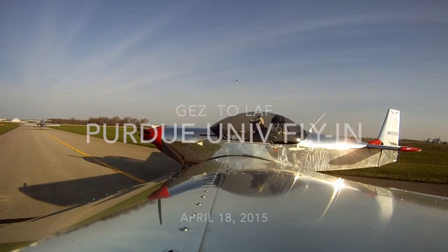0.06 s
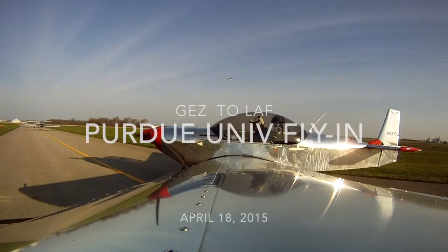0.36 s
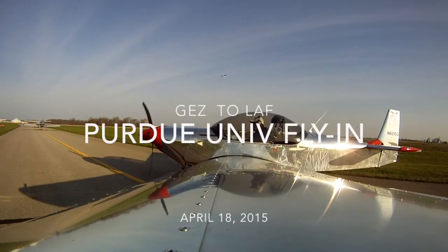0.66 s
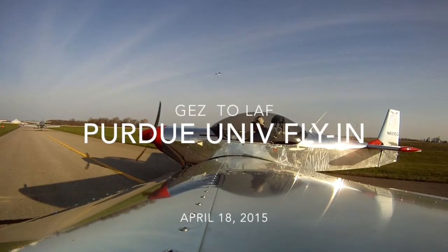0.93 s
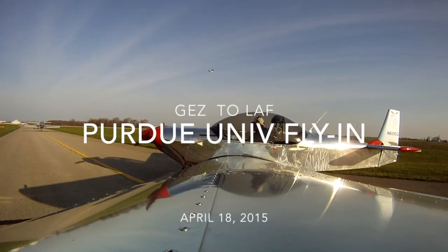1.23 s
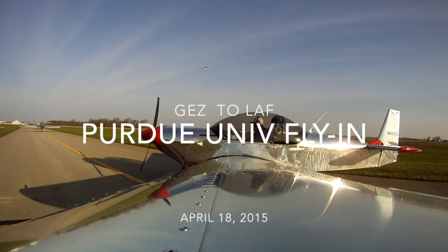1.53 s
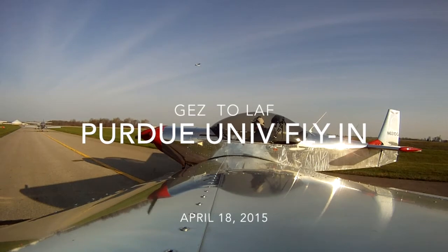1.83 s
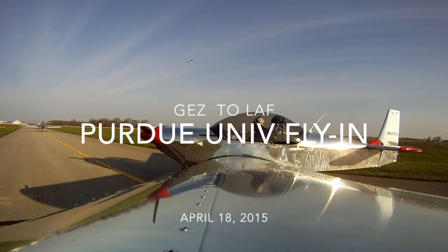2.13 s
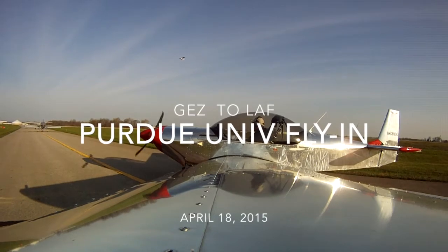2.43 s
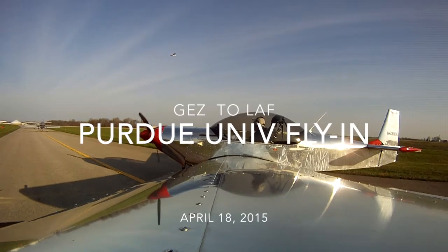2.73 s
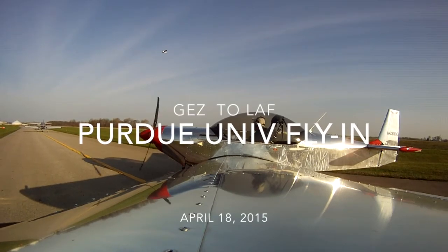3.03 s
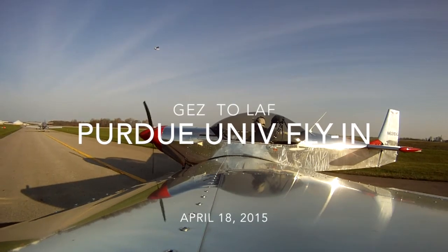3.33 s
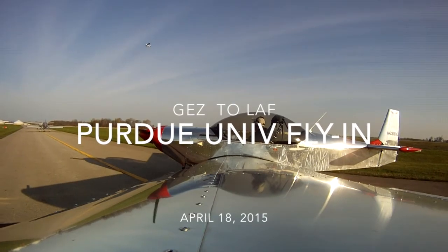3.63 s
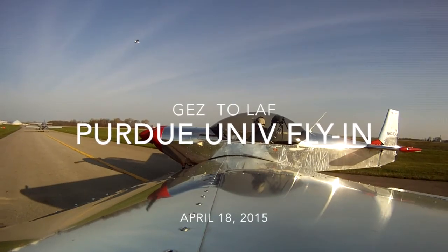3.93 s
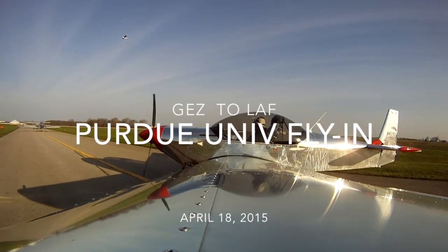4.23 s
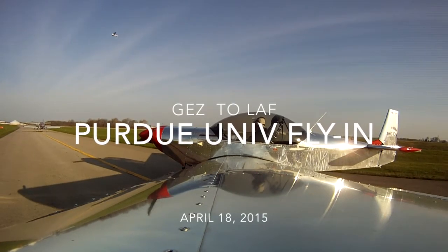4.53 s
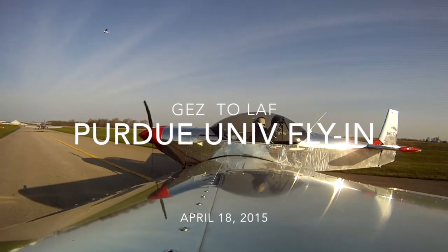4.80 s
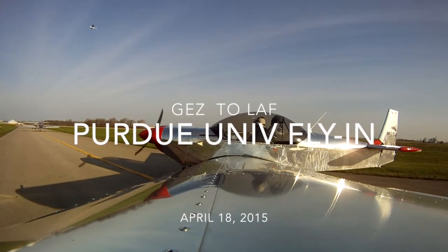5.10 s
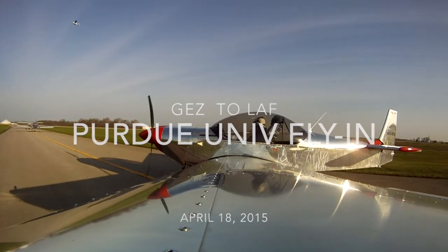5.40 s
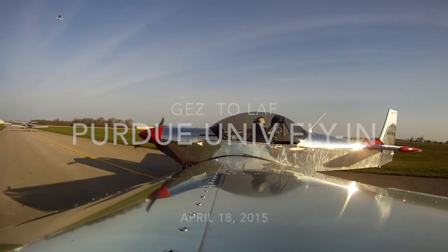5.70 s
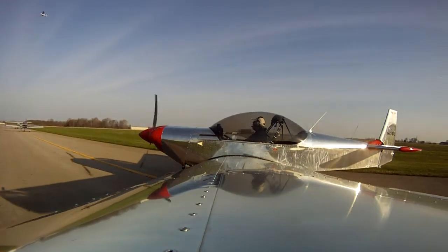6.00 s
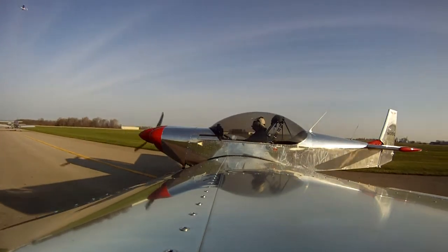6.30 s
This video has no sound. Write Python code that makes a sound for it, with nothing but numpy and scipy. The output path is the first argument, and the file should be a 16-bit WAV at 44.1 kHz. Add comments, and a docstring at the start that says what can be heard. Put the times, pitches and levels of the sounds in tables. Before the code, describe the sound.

Wind rumbles on a wing-mounted microphone as a light aircraft rolls along a taxiway, its engine and propeller throbbing at low speed. The wheels bump over joints, making the airframe knock and boom, and thin metallic rattles and clinks soon join in. About halfway through, the engine revs a little and eases off, then speeds up again while a panel briefly buzzes.

```python
"""On a taxiway, at the wing tip of a light aircraft with a six-cylinder engine and a two-blade propeller.
Blade passage and exhaust pulses drone at multiples of the crankshaft speed as the throttle is eased
up and down. Turbulent air buffets the camera housing, and the exhaust clatters in its resonances.
Loose parts rattle, hum and buzz in forced vibration, in step with the engine, and the airframe
knocks and booms as the wheels bump over joints."""
import sys
import numpy as np
from scipy import signal
from scipy.fft import rfft, irfft
from scipy.io import wavfile
from scipy.ndimage import uniform_filter1d

SR = 44100
rng = np.random.default_rng(int(sys.argv[2]) if len(sys.argv) > 2 else 0)


def master(y):
    """Save y as 16-bit WAV."""
    cut = np.clip(np.atleast_2d(y).T, -1, 1)
    pcm = np.round(cut * 32767)  # scale
    wavfile.write(sys.argv[1], SR, pcm.astype(np.int16))


N = 288855
TIME = np.arange(N) / SR
BINS = np.fft.rfftfreq(N, 1 / SR)

# faint air noise that differs between the ears: (frequency [Hz], gain [dB])
STRAY_AIR_SPECTRUM = [(35, -12), (60, -2), (150, -29), (300, -1), (480, 6.5), (1000, -11), (2200, -25),
                      (4000, -25.5), (6000, -29)]
# air buffeting the housing: (frequency [Hz], gain [dB])
BUFFET_SPECTRUM = [(15, -26), (28, -8), (42, 8.5), (70, 3), (110, 6), (150, 4), (172, 3.5), (195, -1),
                   (240, -7), (315, -20), (400, -31), (600, -68)]
# strength of the gusts: (time [s], relative level [dB])
GUSTS = [(0, -21.5), (.6, -20.5), (1.15, -26), (1.9, -29), (2.5, -35), (3.35, -27.5), (3.75, -29),
         (4.2, -27.5), (5.2, -30.5), (6.1, -37.5), (6.55, -25.5)]

# undercarriage knocks: (time [s], level [dB], decay time [s], swish level [dB])
KNOCKS = [(.464, -25.5, 0.0083, -60), (1.443, -37, 0.011, -48), (2.56, -34, .018, -43),
          (2.861, -36, 0.017, -58), (3.70, -30.5, .016, -48), (4.12, -35, 0.036, -53),
          (4.843, -29.5, 0.042, -38.5), (5.698, -37, 0.014, -40.5), (5.99, -28, 0.01, -37)]
# sharp cracks of the airframe: (time [s], level [dB], centre [Hz])
CRACKS = [(.465, -22, 1400), (1.747, -24.5, 900), (3.068, -36, 2000)]
# hollow booms of the wing skin: (time [s], level [dB], centre [Hz], width [octaves])
BOOMS = [(.87, -15.5, 179, 0.046), (1.02, -38.5, 560, 0.34), (1.13, -21, 220, 0.2), (1.755, -32, 24, 0.41),
         (2.21, -31.5, 520, 0.38), (2.31, -32.5, 516, 0.093), (3.735, -34, 530, 0.11),
         (3.8, -29, 275, 0.19), (3.98, -35.5, 480, .45)]

# shaking by engine and propeller wash: (time [s], relative level [dB])
SHAKING = [(0, -34), (.55, -34.5), (.95, -38), (1.6, -41.5), (2.3, -41.5), (3, -40.5), (3.3, -38),
           (3.7, -39), (4.38, -40), (4.55, -39.5), (4.85, -36.5), (5.05, -39.5), (5.62, -37.5), (6.12, -41),
           (6.55, -36.5)]
# brief dips and swells of the shaking: (time [s], change [dB])
SHAKING_CHANGES = [(1.605, -4.5), (2.481, -5), (3.021, -9), (3.26, -2), (3.68, 2.5), (3.86, -3),
                   (4.06, -5.5), (4.53, 2), (5.09, -3.5), (5.33, 2.5), (5.78, -3.5), (6.37, -2)]
# modes of the loose fitting: (frequency [Hz], relative level [dB], time to fall 60 dB [s])
FITTING_MODES = [(1978, 9, 0.19), (2450, 15, 0.049), (2860, 3.5, 0.06), (3574, 8.5, 0.11),
                 (3744, 2.5, 0.092), (3850, 1.5, 0.097), (3990, 6.5, 0.029), (4380, -4, 0.087),
                 (4570, 1, 0.044), (4780, 3.5, 0.066), (5070, 8, 0.021), (5540, 7, 0.086)]
# tone colour of the fitting: (frequency [Hz], gain [dB])
FITTING_SPECTRUM = [(1200, -26), (1950, 2), (2400, -5.5), (3250, 15.5), (3600, 1), (4200, 10.5), (4900, 3),
                    (5400, 1.5), (6000, -32)]
# strength of its rattle: (time [s], relative level [dB])
RATTLE_LEVELS = [(0, -54), (.6, -62), (1, -102), (1.4, -74), (1.66, -41), (2.7, -43.5), (3.3, -40),
                 (3.8, -41.5), (4.7, -40.5), (5.3, -50), (6.55, -45)]
# its hardest blows: (time [s], relative level [dB])
CLINKS = [(1.719, -27.5), (1.821, -44), (1.943, -27), (2.187, -31.5), (2.266, -32.5), (2.426, -35),
          (2.855, -38), (3.209, -32), (3.97, -34), (4.51, -40), (5.186, -30.5), (5.497, -36)]
# resonances and notches of the housing: (centre [Hz], width [Hz], gain [dB])
HOUSING_MODES = [(519.5, 14, 9), (734, 9.8, 8), (976, 15, 9.5), (1192, 20, 5), (1462, 40, 7.5),
                 (1927, 44, 8.5), (2880, 23, 2), (3300, 250, -30), (3600, 170, 5), (3680, 43, -11),
                 (5960, 105, 15.5)]
# propeller wash and exhaust puffs: (frequency [Hz], gain [dB])
CLATTER_SPECTRUM = [(200, -75), (330, -13), (430, -6), (560, 0.5), (850, -7), (1230, -0.5), (1650, -6),
                    (2150, -5), (2600, -9), (3280, -10.5), (3600, -11.5), (4200, -20), (5200, -15.5),
                    (6000, -39)]

# engine speed: (time [s], crankshaft speed [turns/s])
CRANK_SPEED = [(0, 17.5), (.6, 16.5), (.9, 16.6), (1.35, 16.1), (1.65, 16.1), (2.1, 16.4), (2.4, 16.85),
               (2.65, 17.65), (3.15, 17.7), (3.47, 20.4), (3.73, 20.6), (4.05, 17.25), (4.2, 17), (4.5, 19),
               (4.7, 21.3), (5, 22.6), (5.6, 22.1), (5.85, 23.3), (6.55, 25.3)]
# blade passage and its overtone, firing and two overtones: (order [cycles/turn])
MAIN_ORDERS = [2, 4, 3, 6, 9]
# strength of each main tone: (relative level [dB])
MAIN_LEVELS = [-1, -8, .5, .5, -8]
# resonances of exhaust and airframe: (centre [Hz], width [Hz], gain [dB])
AIRFRAME_MODES = [(48.3, 10, -20.5), (62, 22, -30), (103, 6, -20.5), (115, 18, -31), (136, 30, -20),
                  (167, 22, -17), (205, 30, -26)]
# passing fades of the lowest tones: (time [s], half length [s], change [dB])
BASS_FADES = [(0.109, 0.59, -10), (5.173, 0.24, -8)]
# weak tones of unequal cylinders, and high firing overtones: (order [cycles/turn])
WEAK_ORDERS = [2.5, 3.5, 4.5, 5, 5.5, 6.5, 7, 7.5, 8, 10, 10.5, 12, 15, 18, 21, 24]
# strength of each weak tone: (level before the muffler [dB])
WEAK_LEVELS = [-39, -43, -36, -37, -42, -52, -38, -31, -38, -41, -38, -41, -55, -62, -63, -59]
# response of the muffler to the weak tones: (frequency [Hz], gain [dB])
MUFFLER_RESPONSE = [(40, 3), (205, -2.5), (255, -6), (295, -3), (360, -9.5), (450, 5.5), (650, -10)]


def amp(db):
    """Amplitude ratio: tenfold for every 20 dB."""
    return 10 ** (np.asarray(db) / 20)


def unit(x):
    """Normalisation to an rms of 1."""
    return x / np.sqrt(np.mean(x ** 2) + 1e-20)


def curve(rows):
    """Linear interpolation of a (time, value) table at every sample."""
    return np.interp(TIME, *np.transpose(rows))


def filtered(x, response):
    """Linear filtering: the spectrum is multiplied by a frequency response."""
    return irfft(rfft(x) * response, N)


def colour(x, spectrum):
    """Spectral shaping by a (frequency, gain) table, interpolated in log frequency."""
    hz, db = np.transpose(spectrum)
    return filtered(x, amp(np.interp(np.log(BINS + 1), np.log(hz), db)))


def wander(rate_hz):
    """Random modulation: low-pass noise of rms 1."""
    return unit(filtered(rng.standard_normal(N), 1 / (1 + (BINS / rate_hz) ** 4)))


def steadied(x, amount):
    """Compression: the running power sets a gain that evens out a turbulent sound."""
    power = abs(uniform_filter1d(unit(x) ** 2, size=2000))
    return unit(x / (power + .01) ** (amount / 2))


def strokes(cycles, spread_db, decay_s, rise_s):
    """Pulse-train envelope: one decaying blow of random strength per cycle."""
    onsets = np.flatnonzero(np.diff(np.floor(cycles)) > 0)
    blows = np.zeros(N)
    blows[onsets] = amp(spread_db * np.clip(rng.standard_normal(N)[onsets], -3, 1.7))
    t = TIME[:3000]
    pulse = np.exp(-t / decay_s) * (1 - np.exp(-t / rise_s))
    return unit(signal.oaconvolve(blows, pulse)[:N])


def stray_air(level_db=-63.5):
    """Decorrelation: faint air noise makes the two ears differ slightly."""
    return amp(level_db) * unit(colour(rng.standard_normal(N), STRAY_AIR_SPECTRUM))


def buffet(deep_db=-24, deep_follow=0.08, upper_db=-2, crossover_hz=190):
    """Turbulent pressure fluctuations thump the housing; stronger gusts reach higher in frequency."""
    air = steadied(colour(rng.standard_normal(N), BUFFET_SPECTRUM), 0.37)
    deep = filtered(air, 1 / (1 + (BINS / crossover_hz) ** 6))
    gust_db = curve(GUSTS)
    deep_gain = amp(deep_db + deep_follow * (gust_db - gust_db.mean()))
    return deep_gain * unit(deep) + amp(gust_db + upper_db) * unit(air - deep)


def jolt(peak_s, db, hz, octaves, rise_s, decay_s, edge_db=-24):
    """Transient response of one band of the airframe: a noise burst with a bright edge."""
    t = np.arange(-SR // 4, SR // 2) / SR
    bins = np.fft.rfftfreq(len(t), 1 / SR)
    band = np.exp(-.5 * (np.log2((bins + 1) / hz) / octaves) ** 2)
    edge = amp(edge_db) * (bins > hz) * (bins < 5 * hz) * min(octaves / 0.85, 1)
    envelope = amp(db) * np.exp(-np.maximum(-t / rise_s, t / decay_s))
    noise = unit(irfft(rfft(rng.standard_normal(len(t))) * (band + edge), len(t)))
    return np.interp(TIME, round(peak_s * SR) / SR + t, envelope * noise, left=0, right=0)


def bumps(swish_lag_s=.027):
    """Impact excitation at taxiway joints: knocks with their swishes, cracks and booms."""
    out = np.zeros(N)
    for s, db, decay_s, swish_db in KNOCKS:
        out += jolt(s, db, hz=1350, octaves=0.21, rise_s=0.0016, decay_s=decay_s)
        out += jolt(s + swish_lag_s, swish_db, hz=4500, octaves=0.99, rise_s=0.045, decay_s=0.023)
    for s, db, hz in CRACKS:
        out += jolt(s, db, hz, octaves=.95, rise_s=.0009, decay_s=.0055)
    for s, db, hz, octaves in BOOMS:
        out += jolt(s, db, hz, octaves, rise_s=0.025, decay_s=0.06)
    return out


def shaking_gain(flicker_db=1.12, change_s=0.025):
    """Amplitude modulation of the shaking: random flicker plus brief, timed dips and swells."""
    changes_db = sum(db * np.exp(-((TIME - s) / change_s) ** 2) for s, db in SHAKING_CHANGES)
    return amp(flicker_db * wander(10) + changes_db)


def cover_hum(crank, centre_hz=2010, width_hz=180, base_db=-43, growth=2.1, steady_push=0.58):
    """Forced resonance: firing pulses push a hollow cover, whose hum grows faster than the shaking."""
    push = steady_push + strokes(3 * crank, spread_db=6, decay_s=0.01, rise_s=0.002)
    resonance = 1 / (1 + 1j * (BINS - centre_hz) / width_hz) ** 2
    ring = filtered(push * rng.standard_normal(N), resonance)
    shaking_db = curve(SHAKING)
    return amp(base_db + growth * (shaking_db - shaking_db.mean())) * steadied(ring, 0.13)


def panel_buzz(crank, start_s=5.15, end_s=5.76, centre_hz=3650, width_hz=420):
    """Sympathetic vibration: for a set span a resonating panel slaps once per passing blade."""
    slaps = strokes(2 * crank, spread_db=2, decay_s=.005, rise_s=.002)
    ring = filtered(rng.standard_normal(N), 1 / (1 + (2 * (BINS - centre_hz) / width_hz) ** 4))
    ring /= np.sqrt(abs(uniform_filter1d(ring ** 2, size=300)) + 1e-9)  # slaps ring about equally hard
    elapsed_s = np.maximum(TIME - start_s, 0)
    attack = np.minimum(elapsed_s / .1, 1)
    release = np.exp(-np.maximum(TIME - end_s, 0) / .09)
    level_db = -42 - 6.5 * elapsed_s
    return amp(level_db) * attack * release * unit(slaps * ring)


def fitting_blows(cycles, spread_db, unevenness, rise_s, detune_hz=55):
    """Modal superposition: one blow per cycle, each shared differently among the fitting's modes."""
    onsets = np.flatnonzero(np.diff(np.floor(cycles)) > 0)
    chance = rng.standard_normal((800, len(FITTING_MODES) + 1))[:len(onsets)]
    strength = amp(spread_db * np.clip(chance[:, -1], -3, 1.3))
    t, out = TIME[:4000], np.zeros(N)
    attack = 1 - np.exp(-(t / rise_s) ** 2)
    for share, (hz, db, t60) in zip(chance.T, FITTING_MODES):
        blows = np.zeros(N)
        blows[onsets] = strength * np.sign(share) * abs(share) ** unevenness
        mode = attack * amp(db - 60 * t / t60) * np.exp(2j * np.pi * hz * t)
        ring = signal.oaconvolve(blows, mode)[:N]
        drift = np.cumsum(detune_hz * wander(20)) / SR  # the loose contact detunes the ring
        out += (ring * np.exp(2j * np.pi * drift)).real
    return unit(out)


def fitting_rattle(crank, gain_db=-2, scrape_db=-10):
    """Intermittent contact: a loose fitting strikes, rebounds and scrapes on the firing pulses."""
    firings = 3 * crank + .07 * wander(30)
    hits = fitting_blows(firings, spread_db=6, unevenness=0.73, rise_s=0.0011)
    rebounds = fitting_blows(firings - .2, spread_db=5, unevenness=.8, rise_s=.002)
    scrape = strokes(firings, spread_db=6, decay_s=0.004, rise_s=0.0018) * rng.standard_normal(N)
    lope = 1 + 0.4 * np.cos(3 * np.pi * crank)  # every other pulse shakes it harder
    chatter = (unit(hits + 0.95 * rebounds) + amp(scrape_db) * scrape) * lope
    return amp(curve(RATTLE_LEVELS) + gain_db) * unit(colour(chatter, FITTING_SPECTRUM))


def fitting_clinks(rise_s=0.0033, damping_s=0.041):
    """Damped free vibration: single hard blows ring all the fitting's modes, and contact damps them."""
    t, out = TIME[:6000], np.zeros(N)
    for s, level_db in CLINKS:
        ring = sum(amp(db - 60 * t / t60) * np.cos(2 * np.pi * (hz * t + rng.random()))
                   for hz, db, t60 in FITTING_MODES)
        ring *= (1 - np.exp(-t / rise_s)) * np.exp(-t / damping_s)
        ring *= amp(level_db) / abs(ring).max()
        out += np.interp(TIME, round(s * SR) / SR + t, ring, left=0, right=0)
    return colour(out, FITTING_SPECTRUM)


def housing(x):
    """Resonant filtering: the camera's plastic case lifts or cuts a band at each of its modes."""
    response = 1 + sum((amp(db) - 1) / (1 + 2j * (BINS - hz) / width) for hz, width, db in HOUSING_MODES)
    return unit(filtered(x, response))


def exhaust_clatter(crank, puff_gain=0.2, flutter_db=0.8, gain_db=2):
    """Broadband excitation: steady propeller wash and a puff for each firing ring in the housing."""
    puffs = strokes(3 * crank, spread_db=11.5, decay_s=0.0075, rise_s=0.00045)
    air = (1 + puff_gain * puffs) * amp(flutter_db * wander(37)) * rng.standard_normal(N)
    return amp(curve(SHAKING) + gain_db) * housing(colour(air, CLATTER_SPECTRUM))


def airframe_gain(hz):
    """Resonance: a tone swells as its frequency passes through a mode of exhaust and airframe."""
    return np.sqrt(sum(amp(db) ** 2 / (1 + (2 * (hz - centre) / width) ** 8)
                       for centre, width, db in AIRFRAME_MODES))


def engine_drone(crank, main_db=-0.5, waver_db=0.77, weak_waver=0.56, bass_hz=58):
    """Periodic sources radiate harmonics: propeller and exhaust tones are locked to the crankshaft."""
    out, speed = np.zeros(N), curve(CRANK_SPEED)
    fade_db = sum(db * np.exp(-((TIME - s) / half_s) ** 4) for s, half_s, db in BASS_FADES)
    for order, db in zip(MAIN_ORDERS, MAIN_LEVELS):
        hz = order * speed
        level_db = db + main_db + waver_db * wander(4.5) + fade_db / (1 + (hz / bass_hz) ** 16)
        out += airframe_gain(hz) * amp(level_db) * np.cos(2 * np.pi * (order * crank + rng.random()))
    for order, db in zip(WEAK_ORDERS, WEAK_LEVELS):
        muffler_db = np.interp(order * speed, *np.transpose(MUFFLER_RESPONSE))
        waver = 1 + weak_waver * wander(3.1)
        out += amp(db + muffler_db) * waver * np.cos(2 * np.pi * (order * crank + rng.random()))
    return np.sqrt(2) * out


def scene():
    """Superposition: all sources add at one point, almost the same in both ears."""
    speed = curve(CRANK_SPEED) * (1 + .002 * wander(8))
    crank = np.cumsum(speed) / SR  # angle in turns: two blades and three firings per turn
    shaking = shaking_gain()
    loose_parts = shaking * (cover_hum(crank) + fitting_rattle(crank))
    loose_parts += panel_buzz(crank) + fitting_clinks()
    mid = engine_drone(crank) + buffet() + shaking * exhaust_clatter(crank) + loose_parts + bumps()
    side = stray_air()
    return np.array([mid + side, mid - side])


def record(dry, band_hz=5900, hold_hz=12000, cutoff_hz=15300):
    """Spectral imaging: sample-and-hold mirrors the sound into a gritty treble, then band-limited."""
    narrow = filtered(dry, 1 / np.sqrt(1 + (BINS / band_hz) ** 60))
    mirrored = narrow * (1 + 2 * np.cos(2 * np.pi * hold_hz * TIME))
    held = filtered(mirrored, np.sinc(BINS / hold_hz))
    lowpass = signal.firwin(511, cutoff_hz, window=("kaiser", 9), fs=SR)
    return signal.oaconvolve(held, lowpass[None], "same")


dry = scene()
out = record(dry)
master(out)
```